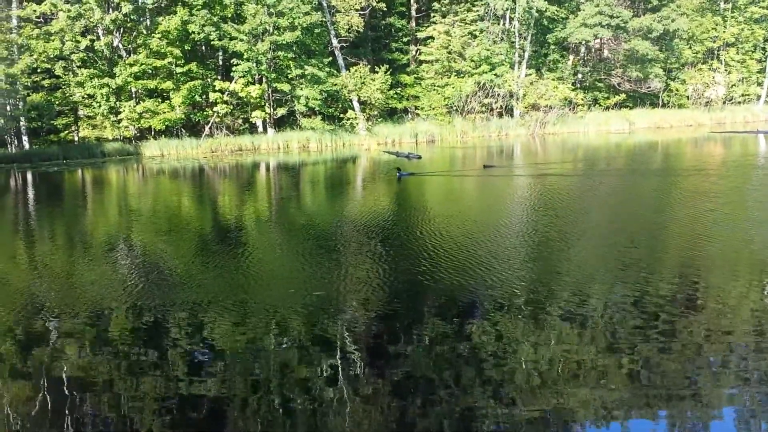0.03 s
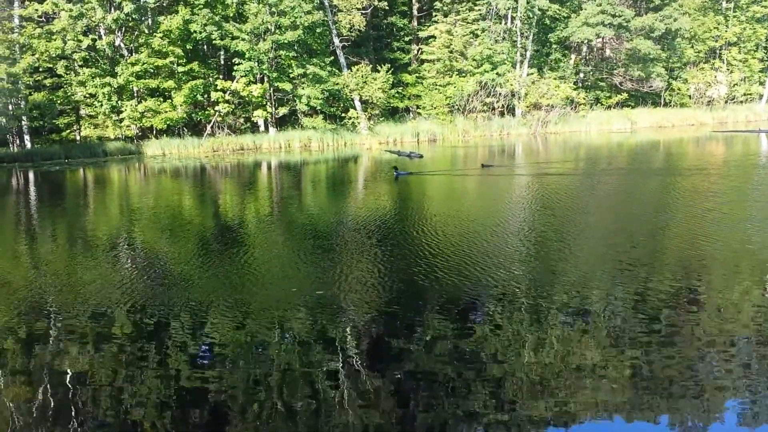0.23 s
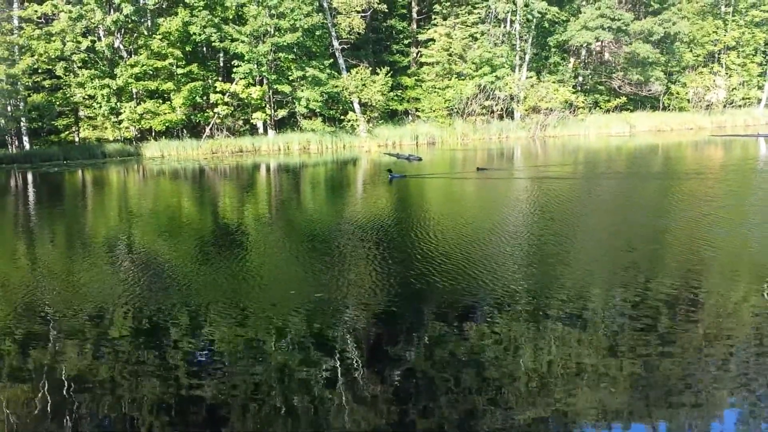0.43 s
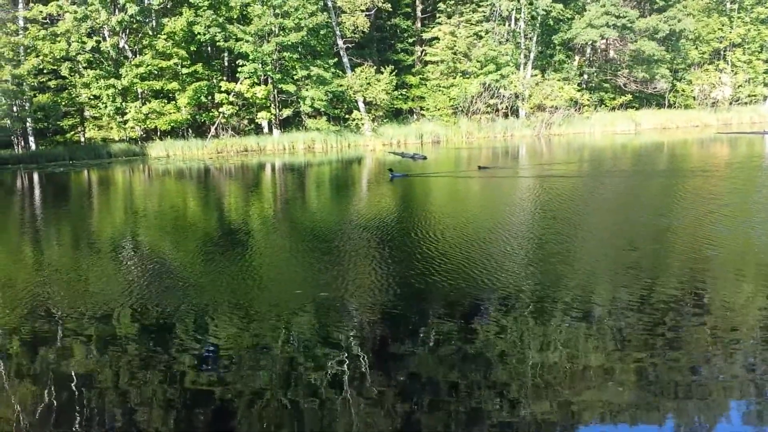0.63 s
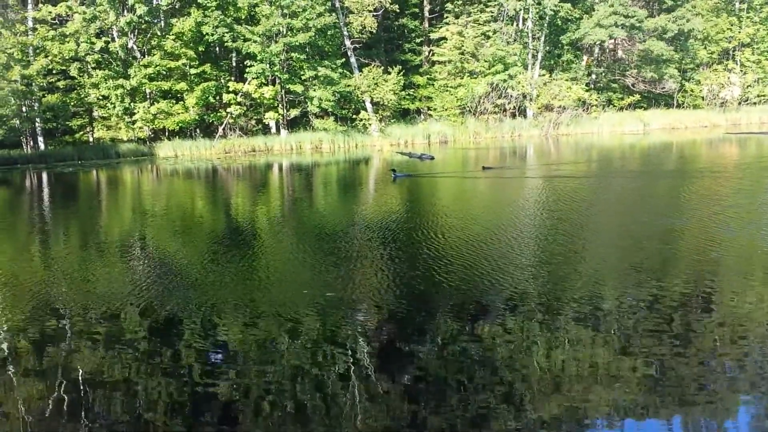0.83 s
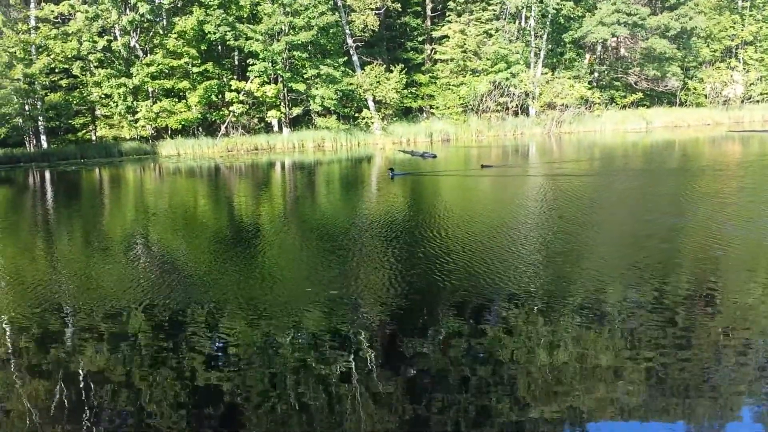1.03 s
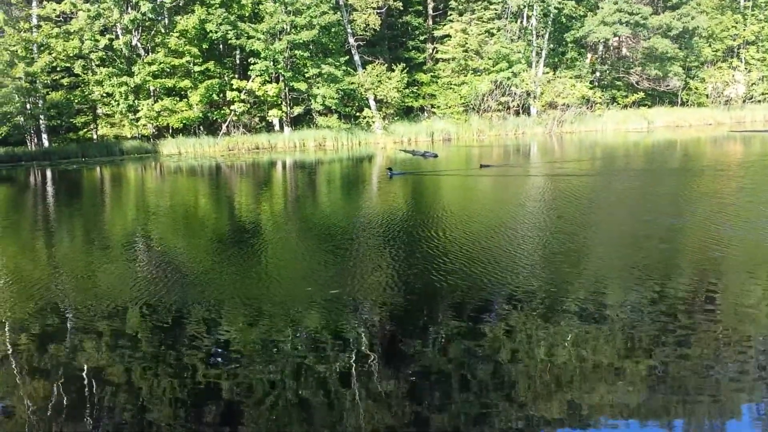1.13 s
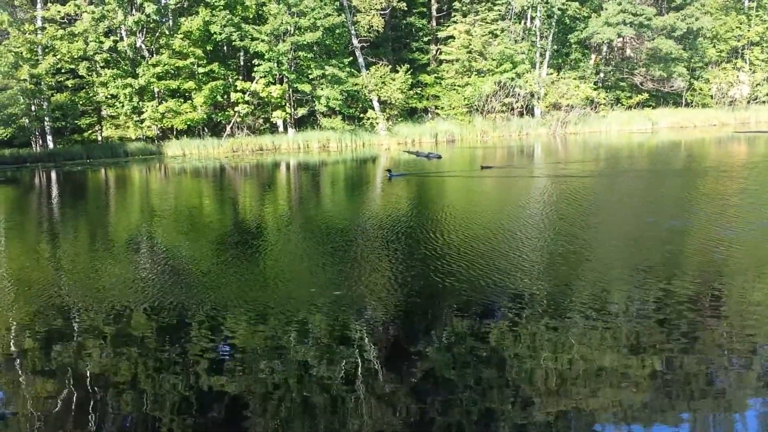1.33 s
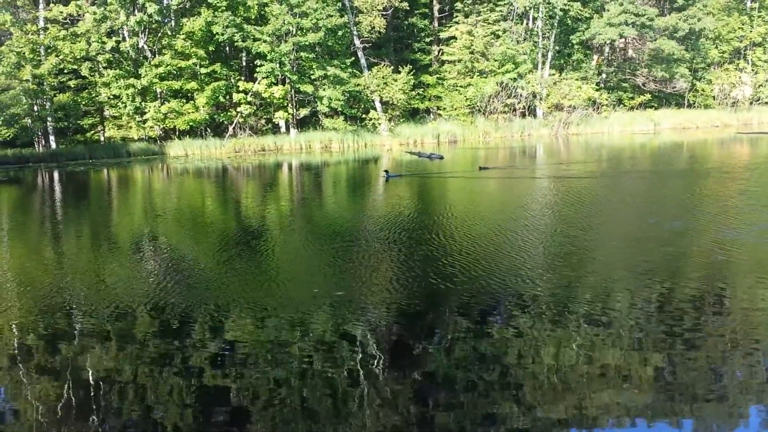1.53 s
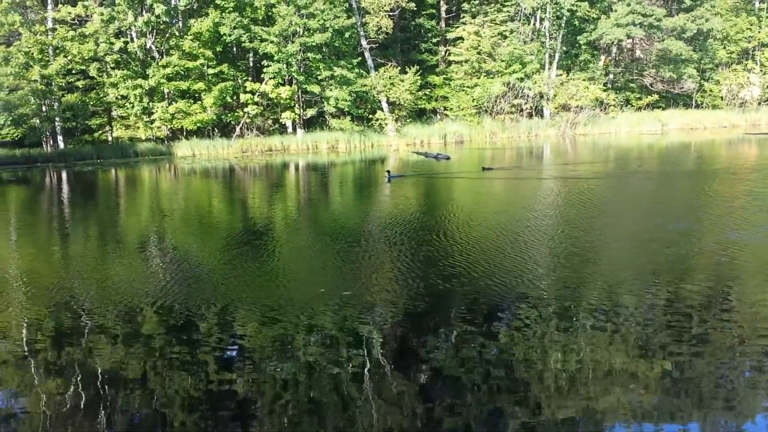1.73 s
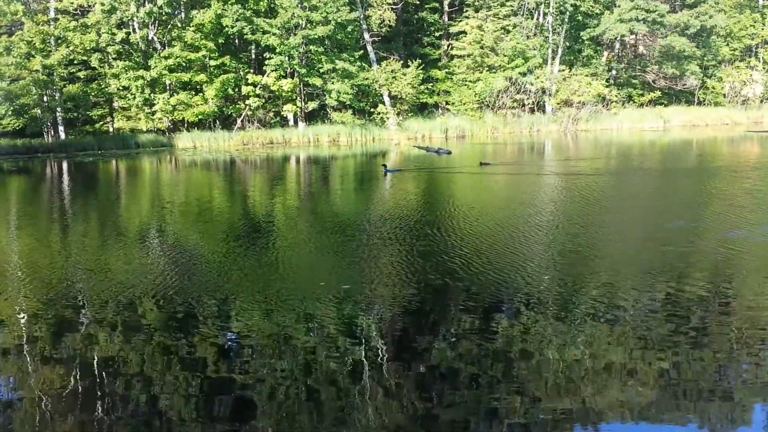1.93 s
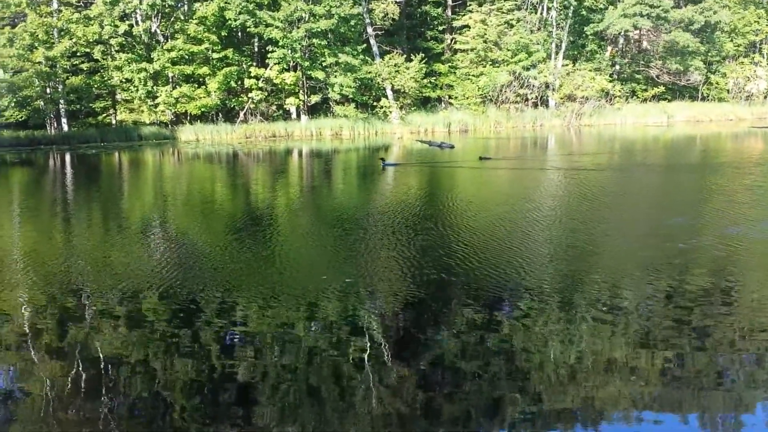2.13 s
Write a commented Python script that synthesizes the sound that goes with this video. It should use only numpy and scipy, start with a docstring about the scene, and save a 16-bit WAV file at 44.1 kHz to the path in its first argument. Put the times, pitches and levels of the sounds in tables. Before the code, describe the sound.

A loon gives one loud, wavering call that echoes over a calm lake.

```python
"""Over a faint hiss and a low rumble, a loon on a calm lake gives one tremolo (quavering) call.
Its voice scoops up into two reedy low arches of pitch, leaps to three loud pure ones, and drops to
a soft closing note. Each note is a tone plus overtones with a few bright, ringing peaks. The hiss
swells with the call and sinks again, while the wooded shore sends back echoes and a long wash.
As the wash dies away, three soft bumps sound nearby."""
import sys
import numpy as np
from scipy import signal
from scipy.fft import rfft, irfft
from scipy.io import wavfile

SR = 44100
rng = np.random.default_rng(int(sys.argv[2]) if len(sys.argv) > 2 else 0)


def unload_wav(signal):
    """Save mono or channel-first audio to the path in sys.argv[1] as 16-bit WAV at rate SR, clipped to [-1, 1]."""
    wavfile.write(
        sys.argv[1],
        SR,
        np.round(np.clip(np.atleast_2d(signal).T, -1, 1) * 32767).astype(np.int16),
    )


N = 97020
T = np.arange(N) / SR

# Tone colour of the hiss in each ear and of the rumble: f/Hz, relative level/dB
HISS_LEFT_COLOUR = [(300, -3), (900, -2.5), (1900, 2), (2700, 1), (3700, -7), (4800, 1.5), (6200, -7),
                    (8000, -13.5), (9000, -15.5), (15000, -16.5)]
HISS_RIGHT_COLOUR = [(300, -5.5), (900, -4.5), (2500, -3), (3700, -2.5), (4700, -1.5), (5500, -4),
                     (6500, 3.5), (7400, 3), (8100, -2), (8800, -7.5), (10500, -13.5), (15000, -14.5)]
RUMBLE_COLOUR = [(20, -13.5), (40, -6.5), (60, 3.5), (90, 1.5), (120, 7), (170, -1), (260, -3), (400, -6.5),
                 (700, -5), (1500, -28)]
# How the hiss swells: t/s, added level/dB
HISS_BOOST = [(0, 2), (.13, 1), (.2, 8), (.32, 11.5), (.6, 13.5), (.9, 12), (1.15, 9), (1.4, 5),
              (1.62, 1.5), (1.82, 2.5), (1.93, 4), (2.2, 1)]
# How the rumble swells: t/s, level/dB
RUMBLE_SWELL = [(0, -69), (.15, -68), (.35, -59), (.8, -60), (1.2, -61.5), (1.6, -69.5), (1.85, -70.5),
                (2, -63.5), (2.2, -71.5)]

# Nearby bumps: t/s, thud level/dB, thud treble cutoff f/Hz, tick level/dB
BUMP_HITS = [(1.394, -44, 607, -59), (1.692, -57.5, 64.6, -92), (1.889, -46, 704, -48)]
# Tone colour of a bump's thud and of its tick: f/Hz, relative level/dB
THUD_COLOUR = [(30, -18), (70, -4), (125, 3), (190, -6), (270, 0), (400, -15.5), (560, -11), (900, -17.5),
               (2000, -10)]
BUMP_TICK_COLOUR = [(200, -3), (600, 2), (1150, -1), (1600, -13), (2300, -10.5), (3000, -26), (8000, -44)]

# Echoes from the shore: delay t/s, level/dB relative to the call
SHORE_ECHOES = [(.096, -21.5), (.111, -25), (0.202, -23.5), (0.221, -28), (.305, -40)]
# Tone colour of the wash from the trees: f/Hz, relative level/dB
TREE_COLOUR = [(400, -6.5), (650, -5), (950, -1.5), (1130, -1.5), (1250, 1), (1500, -6), (1790, 0.5),
               (3500, -1.5), (4700, 1.5), (9000, -10), (15000, -14.5)]

# Tone colour of the overtones above the octave: f/Hz, level/dB
OVERTONE_COLOUR = [(2000, -32), (2700, -58.5), (3150, -66.5), (3650, -46), (4150, -61), (4450, -50),
                   (4750, -50), (5200, -58), (6300, -57.5), (7600, -72), (8800, -61.5), (9600, -60.5),
                   (10500, -72.5), (15000, -79)]
# Turning points of each note: t/s, pitch f/Hz, base tone level/dB, octave level/dB,
# lower overtone level/dB, upper overtone level/dB (the last two add to OVERTONE_COLOUR)
SCOOP_NOTE = [(.160, 370, -68.5, -68, -34, -33), (.184, 556, -56, -54, -29.5, -24.5)]  # the voice catches and slides up
OPENING_NOTE = [(0.181, 724.8, -40, -47, -15.5, -15.5), (0.206, 794.6, -43.5, -30, -12.5, -11.5),
                (0.246, 708, -31, -50.5, -26.5, -8), (.300, 900.8, -27.5, -29.5, 5.5, -10),
                (0.336, 793, -38.5, -44, -15, -3.5)]  # two reedy arches
UNDER_NOTE = [(0.26, 516, -49.5, -74.5, -31.5, -36), (.285, 587, -56, -70.5, -38, -39),
              (.325, 517, -60.5, -70.5, -40.5, -43)]  # faint second tone under the opening
TREMOLO_NOTE = [(.336, 945, -27.5, -63, -19.5, -8), (.395, 1268, -15, -55, 0, -5),
                (.445, 925, -26.5, -64.5, -21.5, -11.5), (.495, 1252, -15.5, -56.5, -2.5, -0.5),
                (.551, 915, -28.5, -70, -20, -10), (.600, 1203, -19, -52, -15, 1.5),
                (.648, 920, -27, -62, -19.5, -8), (.667, 915, -44, -65, -23.5, -18)]  # three loud pure arches
SECOND_NOTE = [(0.342, 628, -58.5, -61.5, -26.5, -9.5), (.378, 751, -45.5, -42, -8, -2.5),
               (0.394, 797, -53.5, -60.5, -20.5, -11.5)]  # faint second tone under the tremolo
CLOSING_NOTE = [(0.668, 645, -34.5, -48, -36, -8), (.718, 668.4, -31.5, -48, -40, -9),
                (0.786, 593.3, -47.5, -49, -29, -33)]  # soft and low


def from_db(db):
    """Turn decibels into a number to multiply by."""
    return 10 ** (np.asarray(db) / 20)


def rms_one(x):
    """Scale a signal so that its average strength (rms) is 1."""
    return x / np.sqrt(np.mean(x ** 2) + 1e-20)


def at_hz(points, hz):
    """Look up a colour table's level in dB, on a log-frequency axis."""
    f, db = np.transpose(points)
    return np.interp(np.log(np.maximum(hz, 1)), np.log(f), db)


def in_time(points):
    """Turn a table of times and levels into a gain for every sample."""
    return from_db(np.interp(T, *np.transpose(points)))


def pan(db):
    """Raise the left ear by db and lower the right by as much."""
    return from_db([[db], [-db]])


def colour(x, spectrum):
    """Make each frequency louder or softer as a colour table says."""
    hz = np.arange(N // 2 + 1) * SR / N
    return irfft(rfft(x) * from_db(at_hz(spectrum, hz)), N)


def stereo_noise(likeness):
    """White noise for two ears: likeness 0 is unrelated, 1 is identical."""
    mid, side = rng.standard_normal((2, N))
    return rms_one(np.sqrt(1 + likeness) * mid + np.sqrt(1 - likeness) * side * [[1], [-1]])


def low_pass(x, hz):
    """Soften everything above hz."""
    return signal.sosfilt(signal.butter(2, hz, fs=SR, output="sos"), x)


def drift(rate_hz):
    """A random wobble of typical size 1."""
    return rms_one(low_pass(rng.standard_normal(N), rate_hz))


def dying(start, rise_s, fade_s):
    """Loudness of a blow: it rises quickly, then loses 60 dB every fade_s."""
    age = np.maximum(T - start, 0)
    return (1 - np.exp(-age / rise_s)) * from_db(-60 * age / fade_s)


def arches(times, values, shape):
    """Join turning points with round-topped arches; a smaller shape narrows the dips."""
    i = np.clip(np.searchsorted(times, T) - 1, 0, len(times) - 2)
    progress = np.clip((T - times[i]) / (times[i + 1] - times[i]), 0, 1)
    a, b = values[i], values[i + 1]
    height = np.sin(np.pi / 2 * np.where(b > a, progress, 1 - progress)) ** shape
    return np.minimum(a, b) + abs(b - a) * height


def background(hiss_db=-64.5):
    """A swelling hiss, brighter on the right, over a low outdoor rumble."""
    left, right = stereo_noise(likeness=.05)
    hiss = rms_one(np.array([colour(left, HISS_LEFT_COLOUR), colour(right, HISS_RIGHT_COLOUR)]))
    rumble = rms_one(colour(stereo_noise(likeness=.85), RUMBLE_COLOUR))
    return from_db(hiss_db) * in_time(HISS_BOOST) * hiss + in_time(RUMBLE_SWELL) * rumble


def bumps(tail_db=-13.5, tick_lead_s=.011):
    """Each bump is a light tick, then a dull thud with a short tail."""
    sound = 0
    for start, thud_db, cutoff_hz, tick_db in BUMP_HITS:
        thud = rms_one(low_pass(colour(stereo_noise(likeness=.98), THUD_COLOUR), cutoff_hz))
        blow = dying(start, rise_s=.0039, fade_s=.16)
        tail = from_db(tail_db) * dying(start, rise_s=.0039, fade_s=.52)
        tick = rms_one(colour(stereo_noise(likeness=.96), BUMP_TICK_COLOUR))
        tick *= dying(start - tick_lead_s, rise_s=.00033, fade_s=.087)
        sound += from_db(thud_db) * thud * (blow + tail) + from_db(tick_db) * tick
    return sound


def shore(call, wash_db=-16, wash_start_s=.085, fade_start_s=.12, fade_s=1.41):
    """The shore reflects the call: a few clear echoes, and a fading wash from countless trees."""
    ripple_db, clump_db = -12, 4
    envelope = from_db(-60 * np.maximum(T - fade_start_s, 0) / fade_s)
    envelope[T < wash_start_s] *= from_db(ripple_db)  # weak scatter off ripples comes first
    envelope *= from_db(clump_db * drift(rate_hz=60))  # some groups of trees answer more strongly
    envelope /= np.sqrt(np.sum(envelope ** 2))
    response = colour(stereo_noise(likeness=.7), TREE_COLOUR) * envelope * from_db(wash_db)
    for delay, db in SHORE_ECHOES:
        response[:, int(delay * SR)] += from_db(db)
    return signal.fftconvolve(call, response, axes=1)[:, :N]


def loon_note(points, octave_flicker_db=0):
    """One note: a clean base tone, its octave, and flickering overtones with a few bright peaks."""
    jitter, rasp = .0012, .008  # tiny wobbles, as fractions of pitch and of strength
    shimmer_db, flicker_db = .25, 3.5  # level wobbles of the whole note and of each overtone
    switch_s, right_lag_s, split_hz = .008, .00005, 4100
    times, hz, *levels = np.transpose(points)
    pitch = arches(times, hz, shape=1.75) * (1 + jitter * drift(rate_hz=120))
    base, octave, lower, upper = (from_db(arches(times, db, shape=.85)) for db in levels)
    inside_s = np.minimum(T - times[0], times[-1] - T)
    gate = np.sin(np.pi / 2 * np.clip(inside_s / switch_s + .5, 0, 1)) ** 2  # smooth on and off
    on = gate > 0
    cycles = np.cumsum(pitch) / SR - np.outer([0, 1], right_lag_s * pitch)
    phase = 2 * np.pi * cycles[:, on]
    octave *= from_db(octave_flicker_db * drift(rate_hz=45))
    voice = np.zeros((2, N))
    voice[:, on] = pan(db=1.15) * base[on] * np.sin(phase)
    voice[:, on] += pan(db=3) * octave[on] * np.sin(2 * phase)
    for k in range(3, 13):
        overtone_hz = k * pitch[on]
        # Around split_hz, blend from the lower overtone level to the upper one.
        blend = np.clip(.5 + 10 * np.log(overtone_hz / split_hz), 0, 1)
        strength = lower[on] ** (1 - blend) * upper[on] ** blend
        colour_db = at_hz(OVERTONE_COLOUR, overtone_hz) + flicker_db * drift(rate_hz=45)[on]
        voice[:, on] += pan(db=-3) * strength * from_db(colour_db) * np.sin(k * phase)
    shimmer = from_db(shimmer_db * drift(rate_hz=60))
    roughness = 1 + rasp * drift(rate_hz=450)
    return np.sqrt(2) * voice * gate * shimmer * roughness


def loon_call():
    """The voice leaps from its quiet low notes up to the loud tremolo and drops back."""
    low_notes = (SCOOP_NOTE, OPENING_NOTE, UNDER_NOTE, SECOND_NOTE, CLOSING_NOTE)
    low_voice = sum(loon_note(points) for points in low_notes)
    return low_voice + loon_note(TREMOLO_NOTE, octave_flicker_db=3.5)


def scene():
    """The call, the shore's answer, the bumps and the quiet around them."""
    call = loon_call()
    return call + shore(call) + bumps() + background()


def record(dry, cutoff_hz=15400):
    """Cut away the very highest treble steeply."""
    return signal.sosfilt(signal.ellip(12, .1, 80, cutoff_hz, fs=SR, output="sos"), dry)


dry = scene()
out = record(dry)
unload_wav(out)
```